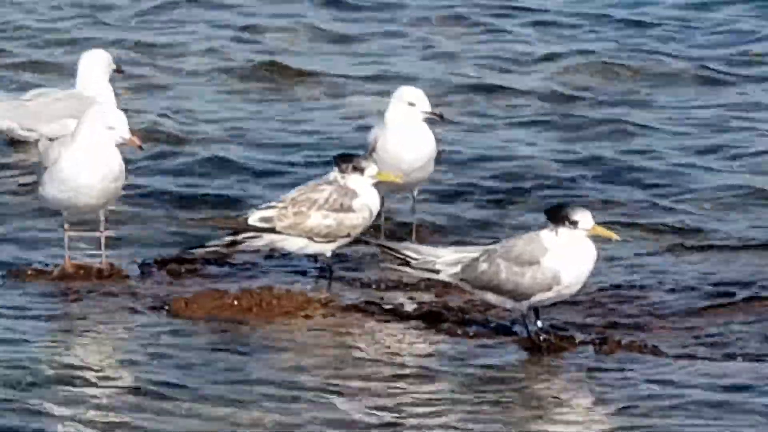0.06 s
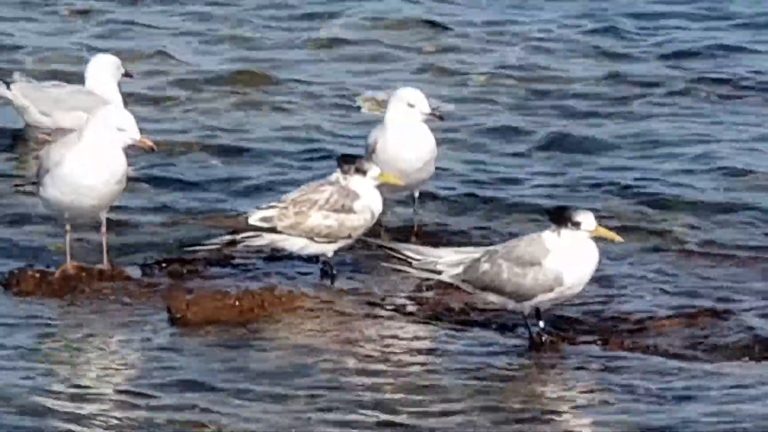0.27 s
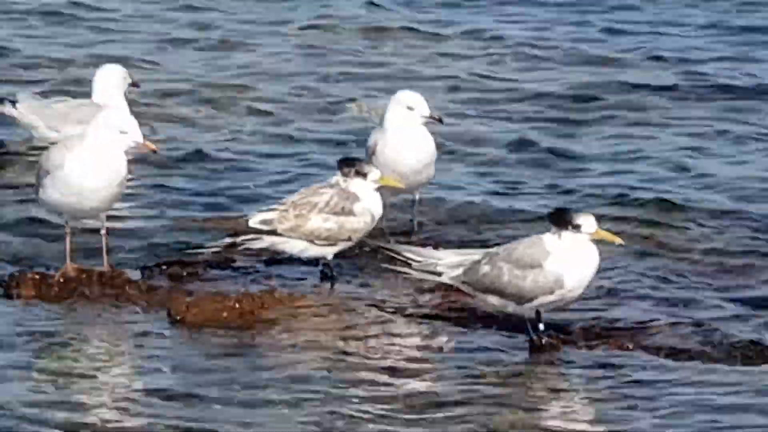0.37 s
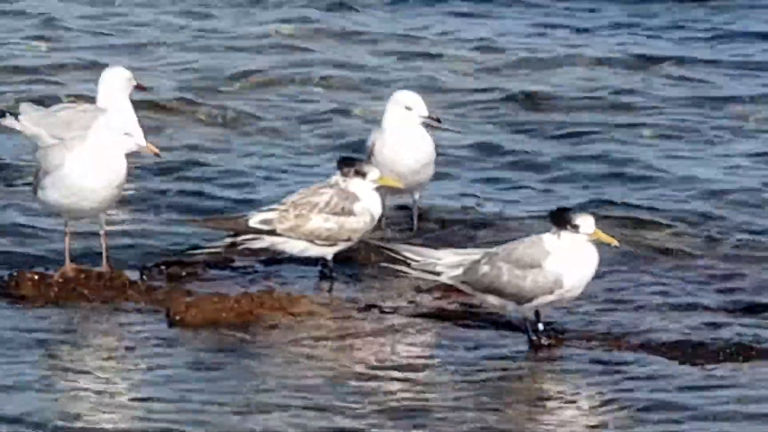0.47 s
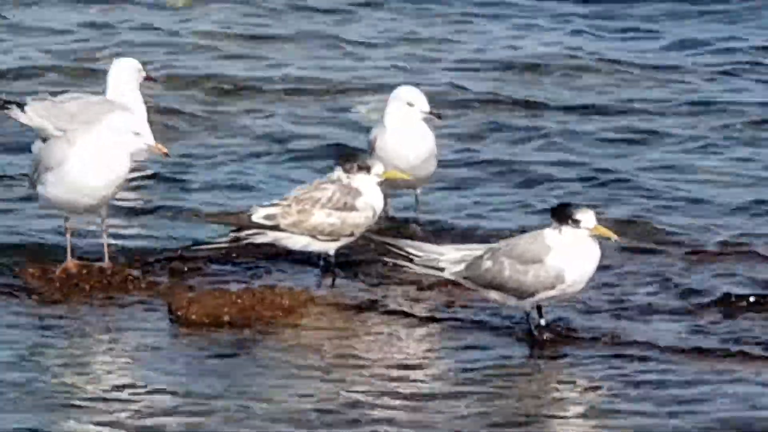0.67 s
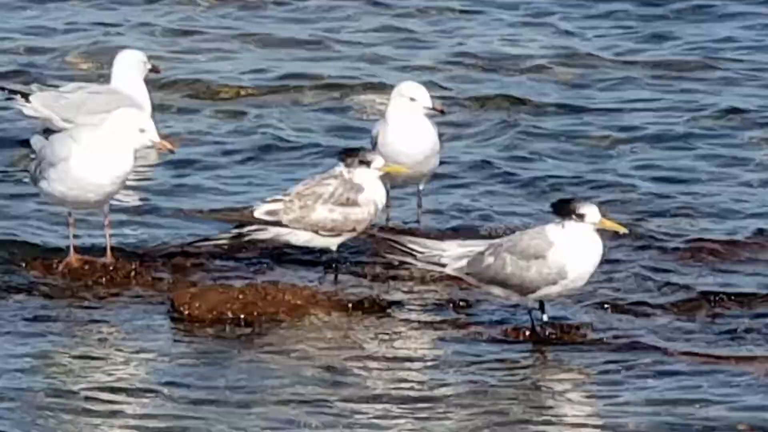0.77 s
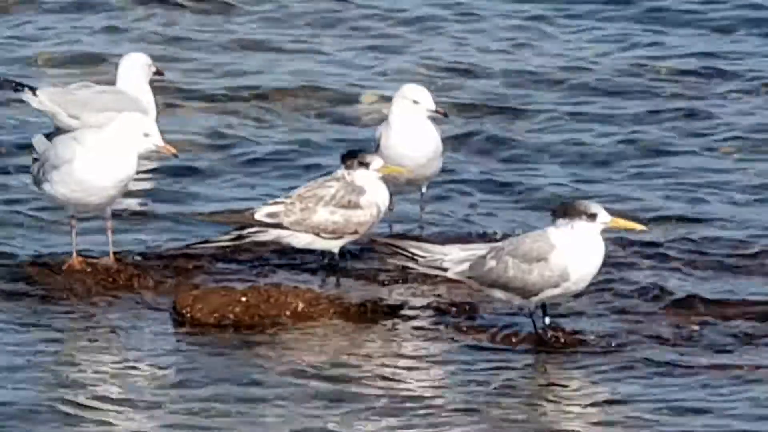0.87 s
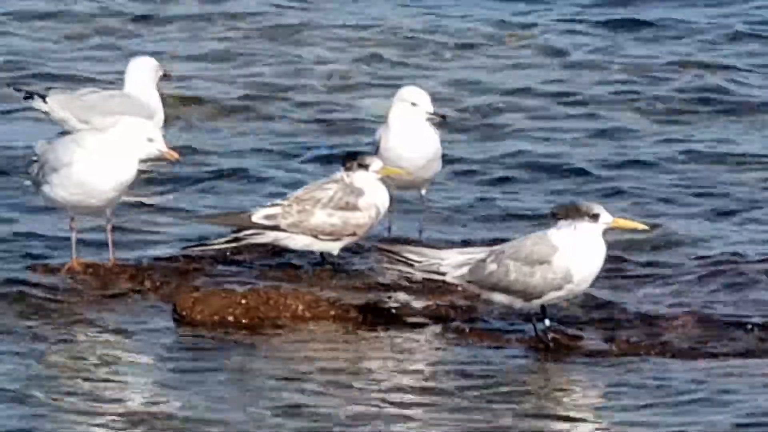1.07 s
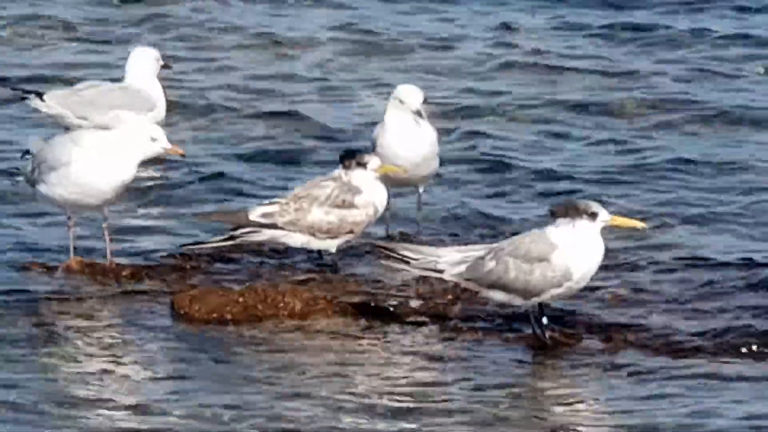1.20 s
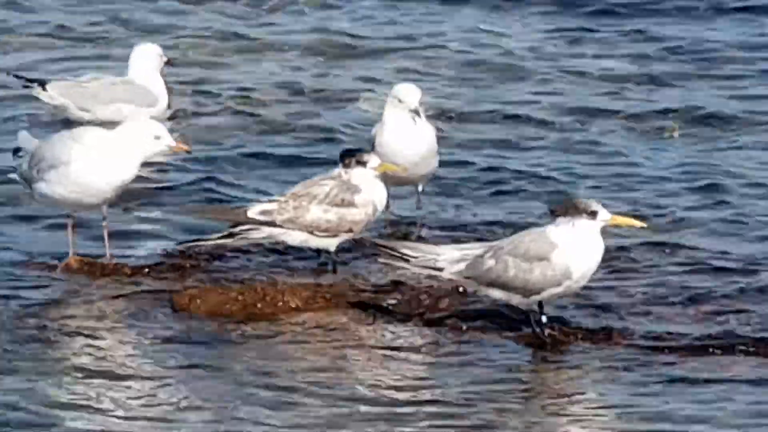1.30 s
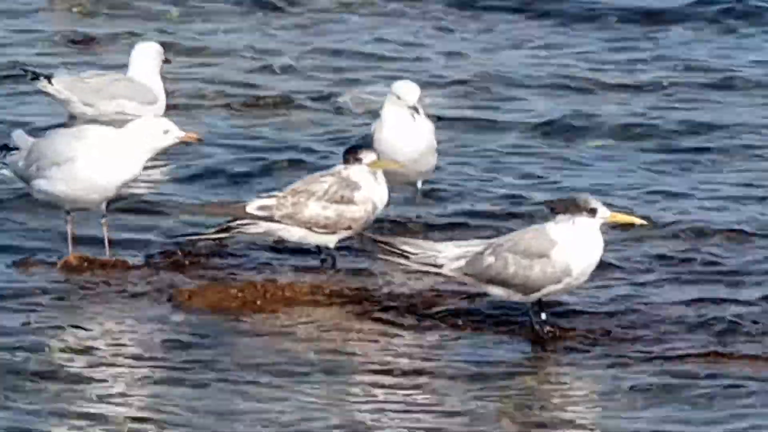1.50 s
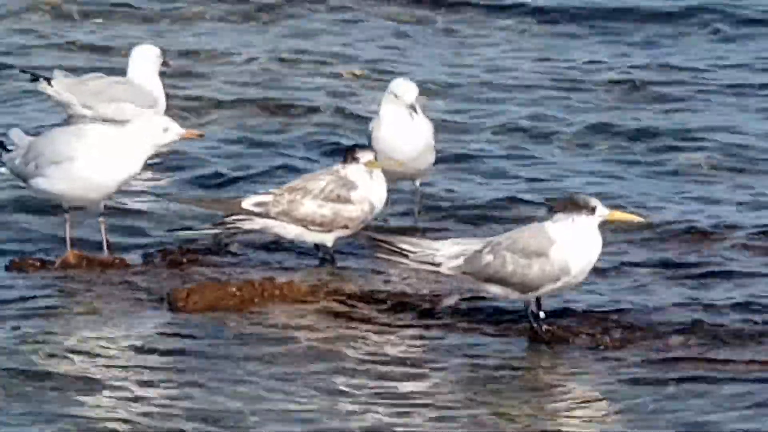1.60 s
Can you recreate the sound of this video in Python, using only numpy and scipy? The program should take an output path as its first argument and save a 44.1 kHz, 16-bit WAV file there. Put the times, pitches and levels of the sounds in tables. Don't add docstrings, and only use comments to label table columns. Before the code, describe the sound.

Over steady lapping water, hiss and soft wind rumble, a faint distant bird trills, then a fairly close tern rasps one rapid, buzzing cry that slows and dies away, leaving drips and wash on open rocky shore.

```python
import sys
import numpy as np
from scipy import signal
from scipy.fft import rfft, irfft
from scipy.io import wavfile

SR = 44100
rng = np.random.default_rng(int(sys.argv[2]) if len(sys.argv) > 2 else 0)


def amplitude_ratio(level_db):
    exponent = np.asarray(level_db, float) / 20
    return 10 ** exponent


def int16_out(signal):
    q = np.round(np.clip(np.atleast_2d(signal).T, -1, 1) * 32767)
    wavfile.write(sys.argv[1], SR, q.astype(np.int16))


N = 72765
TIME_S = np.arange(N) / SR
LEFT_RIGHT = np.array([[1], [-1]])

# (time [s], beats so far [count])
BEATS = [
    (1.015, -1),
    (1.0395, 1),
    (1.1268, 8),
    (1.2245, 16),
    (1.2748, 20),
    (1.329, 24),
    (1.376, 27),
    (1.428, 30),
    (1.47, 32),
]


def rms_one(x):
    return x / np.sqrt(np.mean(x ** 2) + 1e-20)


def in_time(rows):
    s, *columns = np.transpose(rows)
    return [np.interp(TIME_S, s, c) for c in columns]


def gate(rows):
    return (TIME_S > rows[0][0]) & (TIME_S < rows[-1][0])


def at_hz(points, hz):
    points_hz, values = np.array(points)[:, 0], np.array(points)[:, 1]
    return np.interp(np.log(hz), np.log(points_hz), values)


def drift(rate_hz):
    r = np.exp(-2 * np.pi * rate_hz / SR)
    wander = signal.lfilter([1], [1, -2 * r, r * r], rng.standard_normal(N + SR))
    return rms_one(wander[SR:])


def resonate(x, hz, width_hz):
    r = np.exp(-np.pi * width_hz / SR)
    zeros = [(1 - r * r) / 2, 0, (r * r - 1) / 2]
    poles = [1, -2 * r * np.cos(2 * np.pi * hz / SR), r * r]
    return signal.lfilter(zeros, poles, x + 1e-18)


def tone(hz):
    return 2 * np.pi * np.cumsum(hz) / SR


def harmonics(phase, partials):
    return sum(amplitude_ratio(db) * np.sin(k * phase) for k, db in partials)


def blip(s, hz, spread_s, rise):
    t = TIME_S - s
    return np.exp(-.5 * (t / spread_s) ** 2) * np.sin(2 * np.pi * hz * t * (1 + rise * t / spread_s))


def banded_noise(spectrum, patchy_db, rate_hz):
    # (frequency [Hz], correlation [-1 to 1])
    likeness = [(60, 0.36), (180, -0.063), (550, 0.88), (1650, 0.38), (4970, -0.16), (15000, -0.23)]
    # (frequency [Hz], left minus right [dB])
    lean = [(60, 3.5), (180, 5), (550, 0.5), (1650, -0.5), (4970, -1.5), (15000, 16)]
    low_hz, high_hz = spectrum[0][0], spectrum[-1][0]
    edges_hz = np.geomspace(low_hz, high_hz, int(3 * np.log2(high_hz / low_hz)) + 1)
    together = drift(rate_hz / 3)
    white = rng.standard_normal((2, 2, N + SR // 4))
    out = 0
    for k, (low, high) in enumerate(zip(edges_hz, edges_hz[1:])):
        band = signal.butter(2, [low, high], "band", fs=SR, output="sos")
        mid, side = signal.sosfilt(band, white[k % 2])[:, -N:]
        hz = np.sqrt(low * high)
        alike = np.clip(at_hz(likeness, hz), -1, 1)
        flicker_db = patchy_db * (0.31 * together + drift(rate_hz))
        gain = amplitude_ratio(at_hz(spectrum, hz) + flicker_db + at_hz(lean, hz) / 2 * LEFT_RIGHT)
        out = out + gain * (np.sqrt(1 + alike) * mid + np.sqrt(1 - alike) * side * LEFT_RIGHT)
    return rms_one(out)


def motor():
    # (frequency [Hz], width [Hz], level [dB])
    hum_lines = [
        (287.8, 6.4, -51),
        (570.5, 21.3, -59),
    ]
    out = 0
    for hz, width_hz, db in hum_lines:
        waver = amplitude_ratio(3.44 * drift(width_hz))
        out = out + amplitude_ratio(db) * waver * np.sin(tone(hz + width_hz / 2 * drift(width_hz)))
    return out


def wind():
    # (time [s], level [dB])
    gusts = [(0.0, -45), (0.026, -45), (0.178, -53), (0.216, -41.5), (0.27, -49.5), (0.362, -44),
             (0.674, -47.5), (0.702, -43.5), (1.0, -47), (1.028, -42), (1.098, -57.5), (1.18, -40),
             (1.236, -49.5), (1.322, -46), (1.346, -47), (1.414, -45.5), (1.46, -50), (1.65, -49.5)]
    # (frequency [Hz], density [dB per Hz])
    rumble = [(8.8, -19), (15, -17), (80, 7), (258, -4.5), (289, -2.5), (315, -8), (450, -13), (580, -60),
              (990, -120)]
    return amplitude_ratio(in_time(gusts)[0] + 3.0) * banded_noise(rumble, patchy_db=0.5, rate_hz=56.0)


def hiss():
    # (frequency [Hz], density [dB per Hz])
    hiss_spectrum = [(3000, 18), (4000, -2.5), (5100, 3), (6300, -2.5), (7700, 8.5), (9200, 2),
                     (11200, -2.5), (16000, -0.5)]
    return amplitude_ratio(-60.5) * banded_noise(hiss_spectrum, patchy_db=-1.5, rate_hz=5.0)


def water():
    # (time [s], level [dB])
    wash = [(0, -52.5), (.04, -50.5), (.15, -52), (.32, -50.5), (.36, -48.5), (.45, -49), (.6, -50),
            (.69, -49.5), (.75, -47.5), (.79, -48.5), (.82, -47), (.9, -50.5), (1.05, -46), (1.2, -47),
            (1.3, -48), (1.45, -49), (1.58, -50.5), (1.65, -50.5)]
    # (frequency [Hz], density [dB per Hz])
    water_spectrum = [(180, -21), (300, -15), (393, -15.5), (787, -5.5), (887, -19), (1110, -11.5),
                      (1440, -18), (2620, -23), (4000, -43.5), (5200, -21), (8800, -120)]
    wash_db, = in_time(wash)
    body = amplitude_ratio(wash_db) * banded_noise(water_spectrum, patchy_db=2.5, rate_hz=10.1)
    spray = signal.sosfilt(signal.butter(1, 1500, "high", fs=SR, output="sos"), body)
    return body + spray * (amplitude_ratio(wash_db - wash_db.mean()) - 1)


def fizz():
    bursts_per_s = 400 * amplitude_ratio(5.0 * drift(8))
    sizes = amplitude_ratio(5.7 * np.minimum(rng.exponential(1, (2, N)), 4))
    bursts = sizes * (rng.random((2, N)) < bursts_per_s / SR)
    dealt = rng.integers(0, 10, (2, N))
    out = 0
    for k, hz in enumerate(np.geomspace(4600, 12000, 10)):
        out = out + resonate(bursts * (dealt == k), hz, hz / 10.0)
    return amplitude_ratio(-67) * rms_one(out)


def drops():
    # (time [s], peak level [dB], frequency [Hz], left minus right [dB])
    drop_events = [(.006, -56.5, 5200, 14), (.04, -58, 3700, 7), (0.039, -52.5, 2350, -5),
                   (.065, -60, 5000, 0), (.113, -61, 5040, -2), (.148, -59, 5100, 22), (.222, -53, 7500, 0),
                   (0.238, -54, 5600, 0), (.285, -57, 7500, -7), (.395, -51, 7960, 2),
                   (.405, -55, 4900, -3), (.532, -46, 9000, 0), (.596, -53, 4960, -9),
                   (0.737, -51.5, 8100, -2), (0.817, -45.5, 330, 0), (.725, -44, 776, 0),
                   (0.769, -54.5, 1140, 10), (0.754, -52, 2670, -5), (0.201, -50, 11000, 9),
                   (0.368, -44, 1670, .1), (0.441, -55, 7950, 5), (0.481, -48.5, 5430, 4),
                   (0.55, -45, 7760, -10), (0.632, -46.5, 7400, -10), (.641, -47, 5330, -6),
                   (0.749, -43, 1680, .1), (.752, -40.5, 670, -1), (0.96, -52, 5170, 7),
                   (1.499, -51, 11000, -11), (1.516, -49.5, 6900, -7), (1.575, -42, 11000, -4),
                   (1.597, -48.5, 7260, 21), (1.6164, -41, 7660, -22), (1.6161, -40.5, 4100, -2),
                   (1.5, -49, 7300, 0), (1.566, -47, 4930, -4), (1.622, -40, 10500, 11)]
    splat_s, splat_db, cycles = .0016, -5, 3.0
    noise, out = rng.standard_normal(N), 0
    for s, db, hz, pan_db in drop_events:
        burst = noise * np.exp(-.5 * ((TIME_S - s) / splat_s) ** 2)
        splat = amplitude_ratio(splat_db) * resonate(burst, hz, hz / 2) * np.sqrt(SR / hz / 4)
        bubble = blip(s + 0.000555, hz, cycles / hz, 1 / 70)
        out = out + amplitude_ratio(db + pan_db / 2 * LEFT_RIGHT) * (bubble + splat)
    return out


def far_trill():
    # (time [s], peak level [dB], frequency [Hz])
    trill_notes = [(.412, -60, 2700), (0.436, -52.5, 2930), (.459, -58, 3060), (0.458, -53, 2630),
                   (.471, -65, 3140), (0.482, -52.5, 2570), (0.484, -56, 3100), (0.506, -53, 2510),
                   (0.506, -59.5, 3200), (.521, -55, 2810), (0.531, -50, 2360), (.548, -59, 2670),
                   (0.574, -57.5, 1910)]
    flutter = 1.51 + 1.35 * np.array([drift(520), drift(650)])
    return flutter * sum(amplitude_ratio(db) * blip(s, hz, .005, -0.011) for s, db, hz in trill_notes)


def whistle():
    # (time [s], level [dB], pitch [Hz])
    whistle_path = [
        (.978, -66, 1640),
        (.986, -37, 1720),
        (.996, -39, 1900),
        (1.004, -41, 1940),
        (1.011, -44, 1780),
        (1.015, -66, 1700),
    ]
    # (multiple of pitch, level [dB])
    whistle_partials = [(2 / 3, -12), (1, 0), (2, -9)]
    level_db, hz = in_time(whistle_path)
    phase = tone(hz * (1 + 0.017 * drift(234)))
    return amplitude_ratio(level_db) * gate(whistle_path) * harmonics(phase, whistle_partials)


def croak():
    # (time [s], level [dB], pitch [Hz])
    croak_path = [
        (1.006, -70, 700),
        (1.012, -40, 700),
        (1.034, -41, 712),
        (1.042, -50, 690),
        (1.07, -50, 720),
        (1.08, -68, 700),
    ]
    # (multiple of pitch, level [dB])
    croak_partials = [(1, -5), (2, 1), (3, -12), (4, -14), (5, -1)]
    level_db, hz = in_time(croak_path)
    phase = tone(hz * (1 + 0.01 * drift(210)))
    return amplitude_ratio(level_db + 2.0 * drift(81)) * gate(croak_path) * harmonics(phase, croak_partials)


def low_voice():
    # (time [s], level [dB], pitch [Hz], pitch dip between throbs [0-1])
    low_path = [
        (1.035, -56, 1650, .2),
        (1.054, -35, 1770, .3),
        (1.105, -35.5, 1770, .3),
        (1.125, -41, 1930, .45),
        (1.148, -43, 1880, .45),
        (1.17, -39, 1700, .3),
        (1.195, -50, 1750, .2),
    ]
    throb_start_s, throbs_per_s = 1.0465, 44.6
    level_db, hz, dip = in_time(low_path)
    throb = np.pi * (TIME_S - throb_start_s) * throbs_per_s
    arch = np.sin(throb)
    bend = np.abs(np.sin(throb - np.pi * .06))
    swell = arch * np.abs(arch) ** .1
    phase = tone(hz * (1 + 0.043 * drift(450) - dip * (1 - bend) ** 2))
    return 2 * amplitude_ratio(level_db + 2.0 * drift(330)) * gate(low_path) * swell * np.sin(phase)


def knocks():
    # (time [s], level [dB], pitch [Hz])
    knock_path = [
        (1.17, -62, 1900),
        (1.2, -47, 1950),
        (1.25, -44, 1880),
        (1.3, -42, 1720),
        (1.35, -44, 1580),
        (1.41, -48, 1430),
        (1.45, -62, 1300),
    ]
    rise_beats, fall_beats = .1, .15
    turn = (in_time(BEATS)[0] + 0.19) % 1 - .2
    level_db, hz = in_time(knock_path)
    knock = np.exp(-.5 * (turn / np.where(turn < 0, rise_beats, fall_beats)) ** 2) + .08
    carrier = np.sin(tone(hz * (1 + .04 * drift(200))))
    return 2 * amplitude_ratio(level_db + 2 * drift(60)) * gate(knock_path) * knock * carrier


def throat(source, shape):
    out = 0
    for k, (hz, width_hz, db) in enumerate(shape):
        out = out + (-1) ** k * amplitude_ratio(db) * resonate(resonate(source, hz, width_hz), hz, 2 * width_hz)
    return rms_one(out)


def gliding_notch(x):
    # (time [s], frequency [Hz])
    notch_path = [
        (1.02, 8040),
        (1.12, 7070),
        (1.21, 7300),
        (1.3, 8600),
        (1.33, 7760),
        (1.36, 6700),
        (1.45, 6440),
    ]
    width_hz, depth = 800, .85
    turning = np.exp(1j * tone(in_time(notch_path)[0]))
    around = signal.filtfilt(*signal.butter(1, width_hz / 2, fs=SR), x / turning)
    return x - 2 * depth * np.real(turning * around)


def rattle():
    # (time [s], level [dB], chirp pitch [Hz], roughness [0-1], beak closed [0-1])
    effort = [
        (.98, -57, 1360, 0.6, 0.3),
        (1.021, -44, 1366, 0.9, 0.87),
        (1.04, -31.5, 1354, 0.71, 0.73),
        (1.13, -33, 1390, 0.6, .6),
        (1.165, -29.5, 1421, 0.22, 0),
        (1.262, -31, 1415, 0.22, 0),
        (1.285, -34.5, 1446, 0.56, 0.72),
        (1.41, -48.5, 1392, 0.67, 1),
        (1.45, -61, 1380, 1.1, 0),
    ]
    # (frequency [Hz], width [Hz], level [dB])
    open_beak = [(3190, 150, 8), (4157, 170, 9.5), (4520, 650, 9), (5900, 850, -7.5), (8670, 1040, -2),
                 (11260, 650, -22), (11790, 550, -4), (13400, 3100, -25)]
    # (frequency [Hz], width [Hz], level [dB])
    closed_beak = [(2980, 3000, 2.5), (3990, 760, 10), (4890, 530, 8), (6770, 860, -2.5), (7600, 1600, -3),
                   (11000, 6300, -12), (14500, 5500, -14)]
    rise, peak_beats, swell_beats, fall_beats = 0.326, 0.2836, 0.15, 0.043
    beats, = in_time(BEATS)
    turn = (beats + .2) % 1 - .2
    level_db, hz, rough, closed = in_time(effort)

    phase = tone(hz * (1 + rise * (turn - peak_beats) + 0.021 * rough * drift(300)))
    new_beat = np.diff(turn, prepend=0) < -.5
    phase = phase - np.maximum.accumulate(phase * new_beat)
    buzz = rms_one(sum(np.cos(k * phase) for k in range(2, 11)))
    noise_share = np.clip(rough, 0, 1)
    source = np.sqrt(1 - noise_share) * buzz + np.sqrt(noise_share) * rng.standard_normal(N)

    width = np.where(turn < peak_beats, swell_beats, fall_beats * (1 + 3.7 * closed))
    swell = np.exp(-.5 * ((turn - peak_beats) / width) ** 2)
    breath = amplitude_ratio(-12.5) * rng.standard_normal(N)
    source = source * swell * amplitude_ratio(2.0 * rough * drift(170)) + breath

    closed = np.clip(closed, 0, 1)
    voiced = (1 - closed) * throat(source, open_beak) + closed * throat(source, closed_beak)
    return gliding_notch(amplitude_ratio(level_db) * gate(effort) * voiced)


def arrive(x, lag_s):
    # (delay [s], level [dB])
    bounce_paths = [
        [(.0030, -8), (.0071, -15)],
        [(.0035, -17), (.0092, -18)],
    ]
    # (frequency [Hz], left minus right [dB])
    port_lean = [(60, -4), (150, 5), (380, -19), (950, 5.5), (2380, -4), (5980, -3.5), (15000, 6)]
    scatter_db, scatter_t60_s = -11, .045
    hz, t = np.fft.rfftfreq(2 * N, 1 / SR), np.arange(SR // 4) / SR
    tail = rng.standard_normal((2, len(t))) * amplitude_ratio(-60 * t / scatter_t60_s) * (t > .002)
    scatter = amplitude_ratio(scatter_db) * rfft(tail / np.sqrt(np.sum(tail[0] ** 2)), 2 * N)
    bounces = np.array([1 + sum(amplitude_ratio(db) * np.exp(-2j * np.pi * hz * s) for s, db in side)
                        for side in bounce_paths])
    lag = np.exp(-2j * np.pi * hz * lag_s * np.array([[0], [1]]))
    ports = amplitude_ratio(at_hz(port_lean, hz + 1) / 2 * LEFT_RIGHT) * lag
    return irfft(rfft(x, 2 * N) * (bounces + scatter) * ports)[:, :N]


def tern():
    voices = low_voice() + whistle() + croak()
    return arrive(voices, lag_s=.00050) + arrive(rattle() + knocks(), lag_s=.00029)


def scene():
    background = motor() + wind() + hiss()
    shore = water() + fizz() + drops()
    return background + shore + far_trill() + tern()


def low_pass(x):
    return signal.sosfilt(signal.butter(12, 16410, fs=SR, output="sos"), x)


def record(dry):
    lowpass = signal.cheby2(14, 70, 16500, fs=SR, output="sos")
    return low_pass(signal.sosfilt(lowpass, dry))


dry = scene()
out = record(dry)
int16_out(out)
```